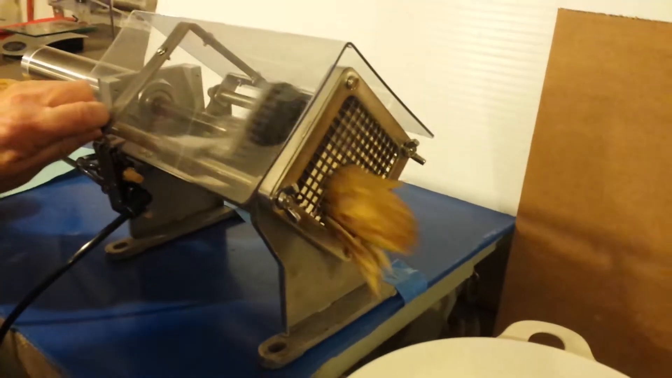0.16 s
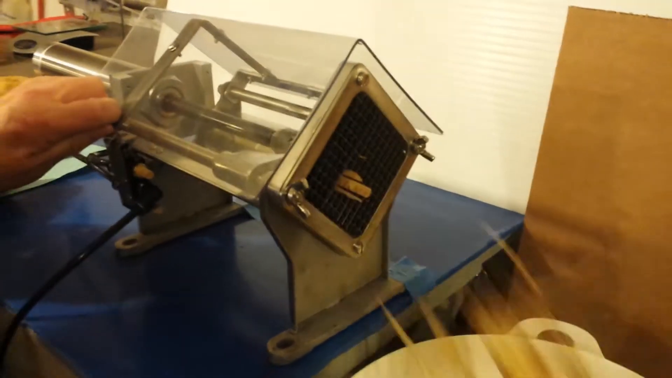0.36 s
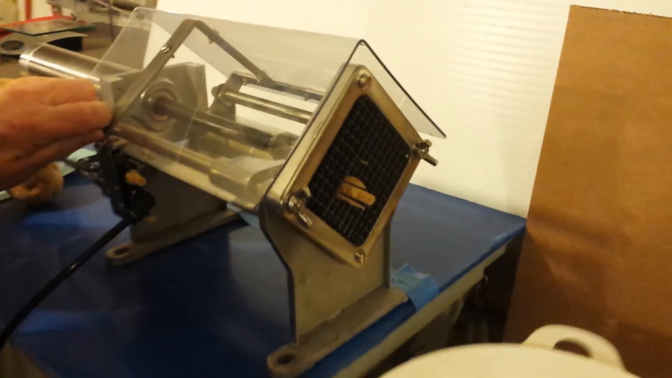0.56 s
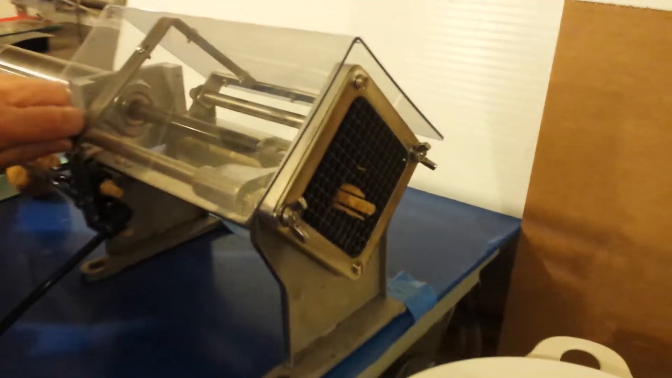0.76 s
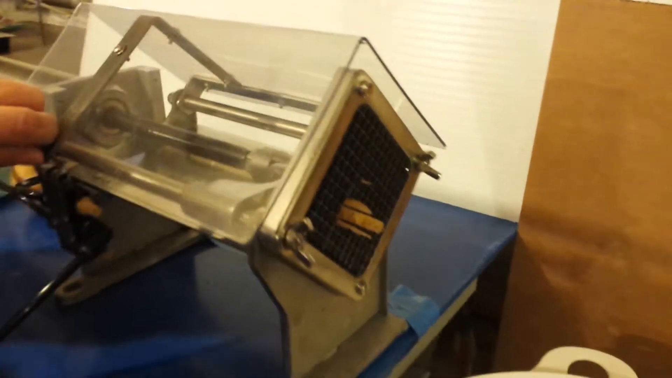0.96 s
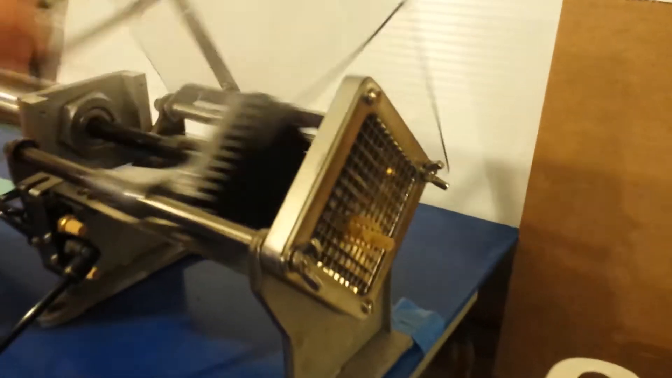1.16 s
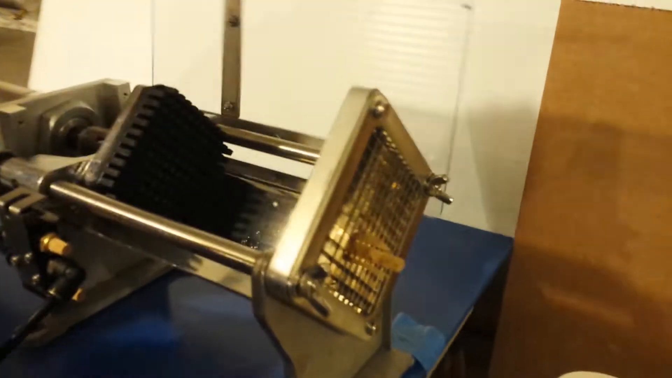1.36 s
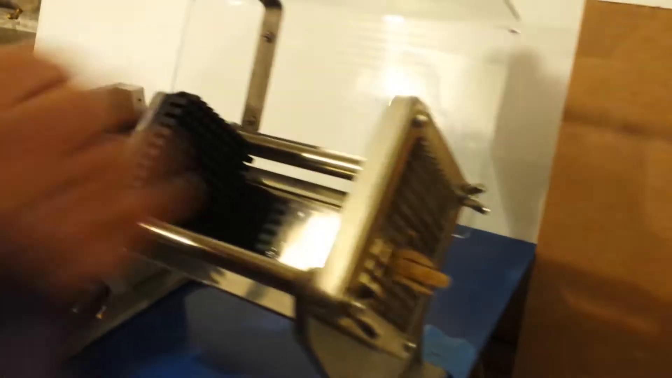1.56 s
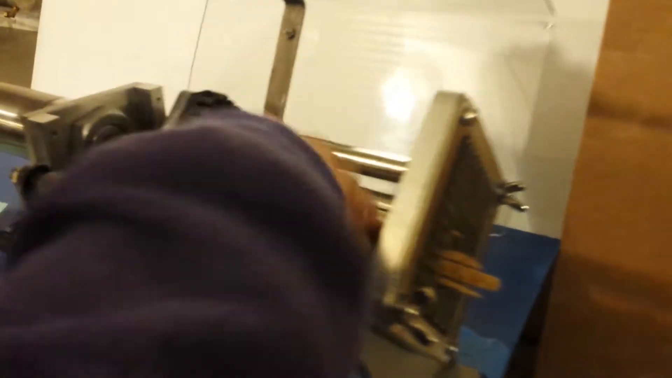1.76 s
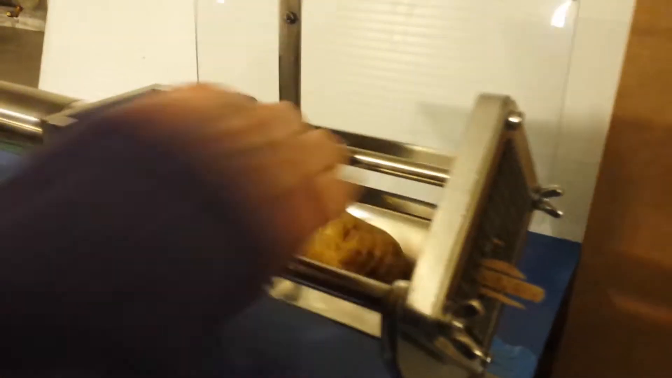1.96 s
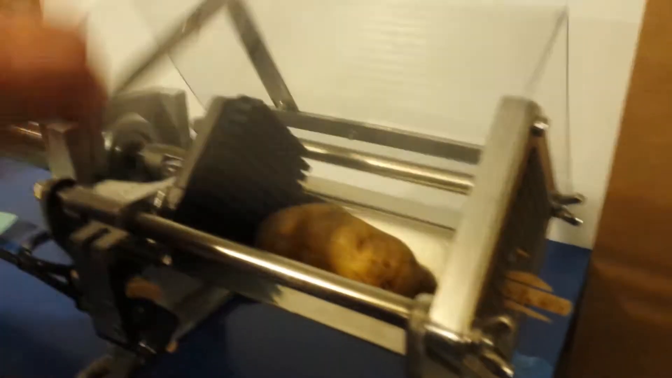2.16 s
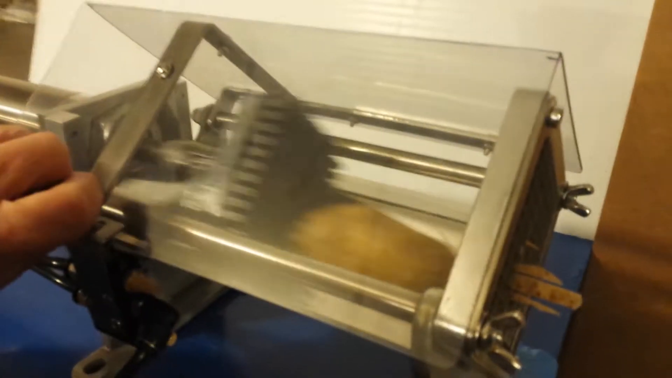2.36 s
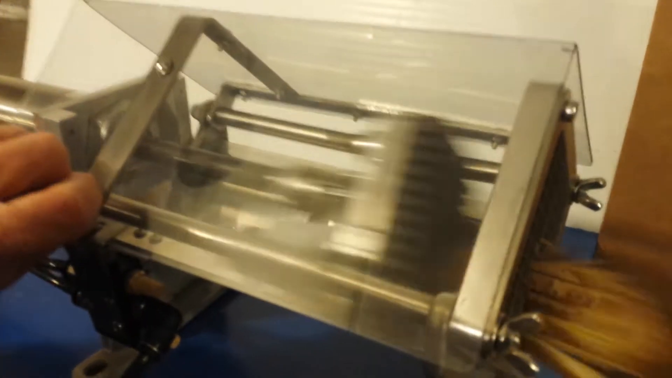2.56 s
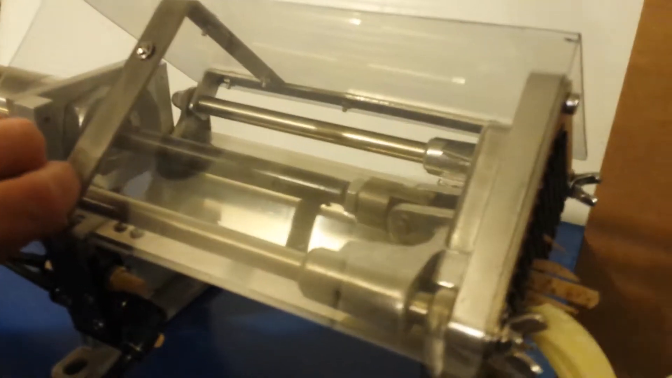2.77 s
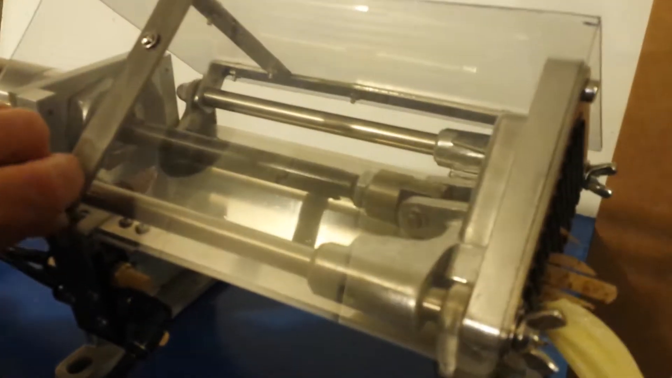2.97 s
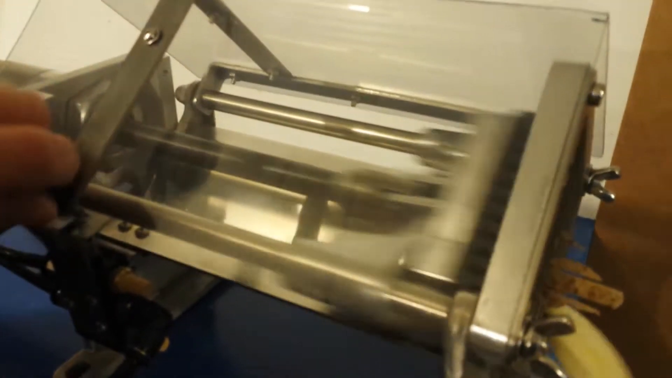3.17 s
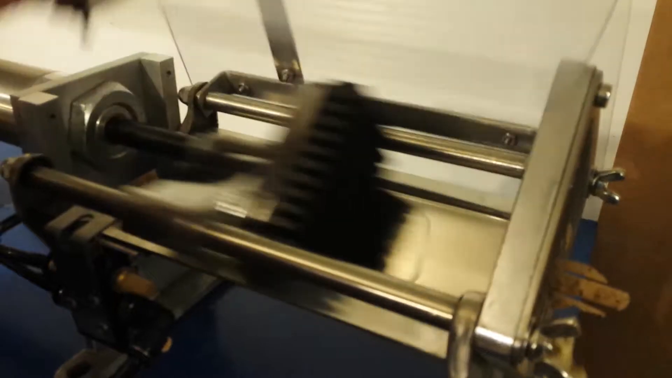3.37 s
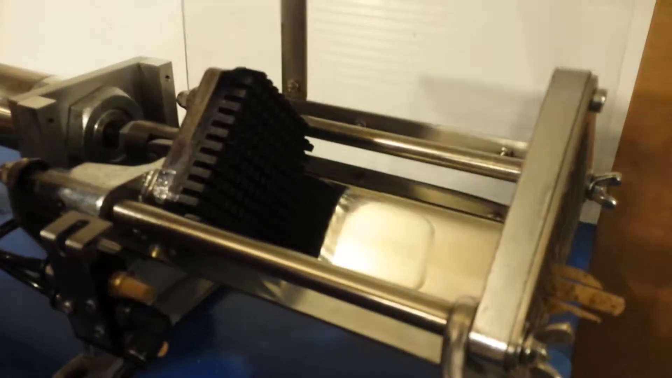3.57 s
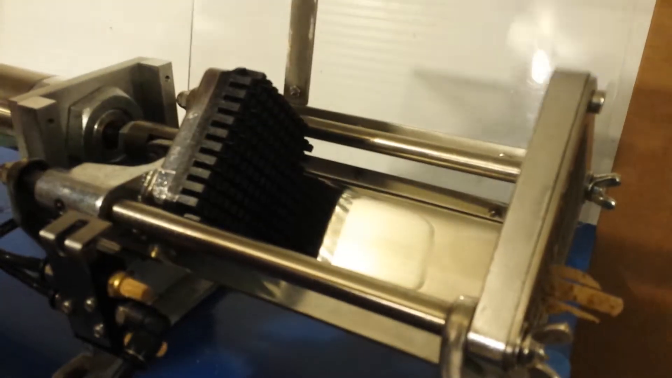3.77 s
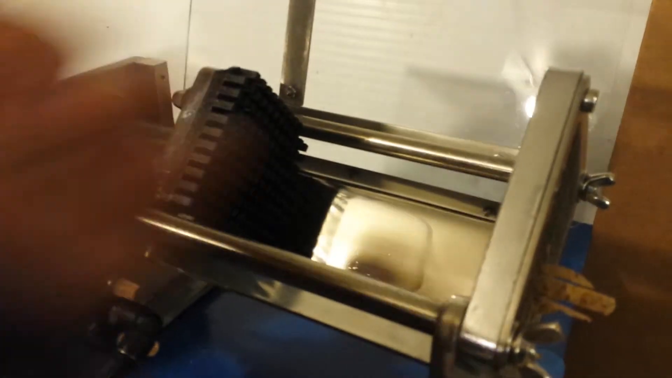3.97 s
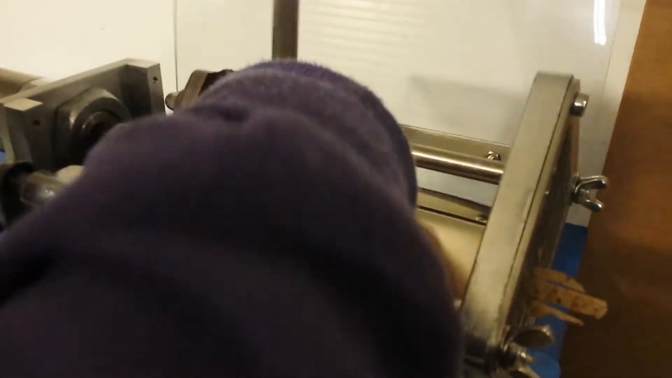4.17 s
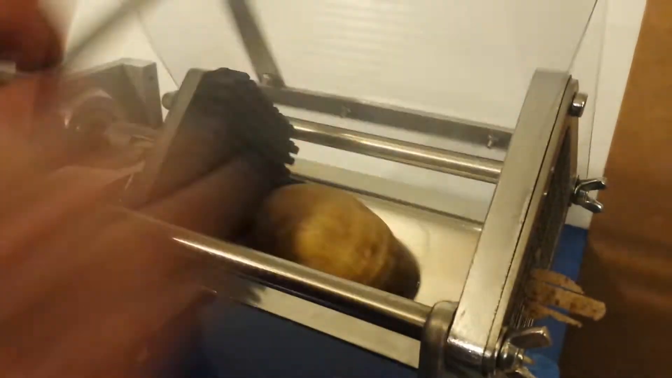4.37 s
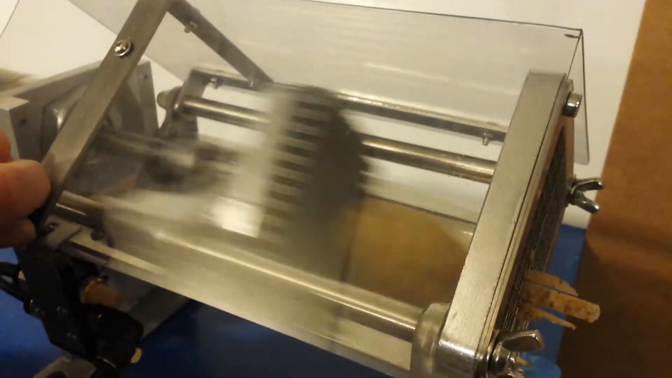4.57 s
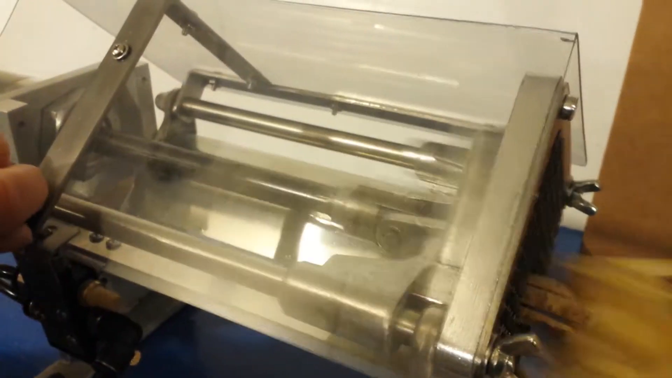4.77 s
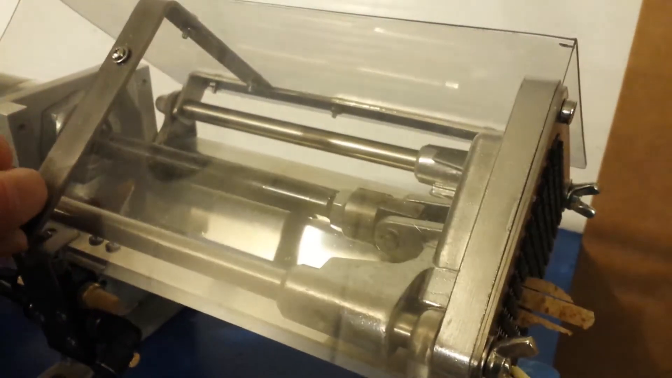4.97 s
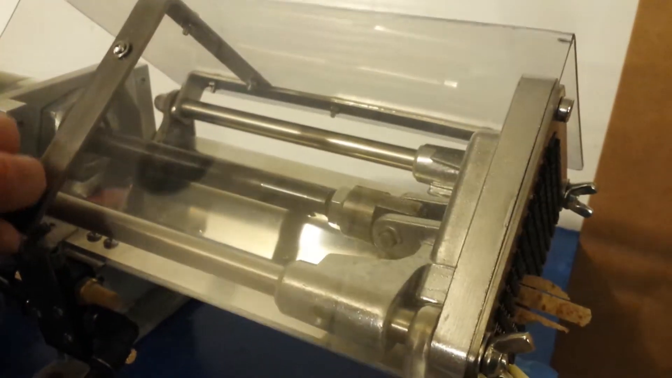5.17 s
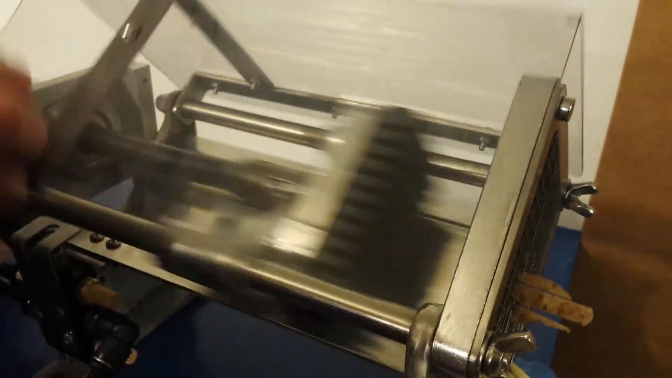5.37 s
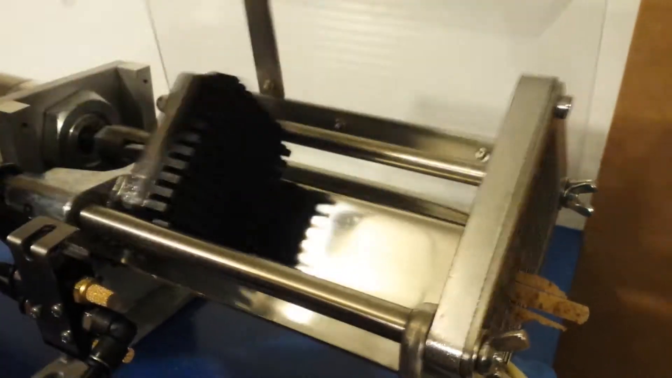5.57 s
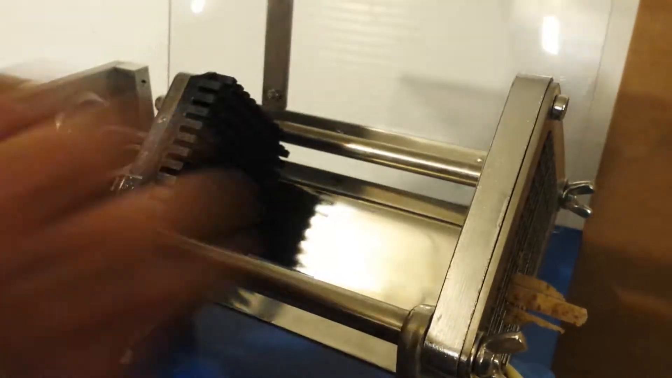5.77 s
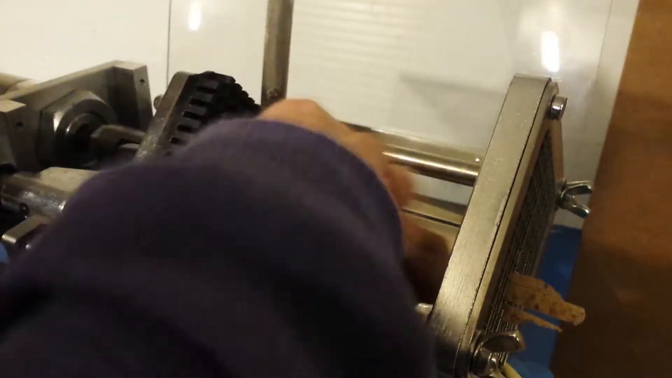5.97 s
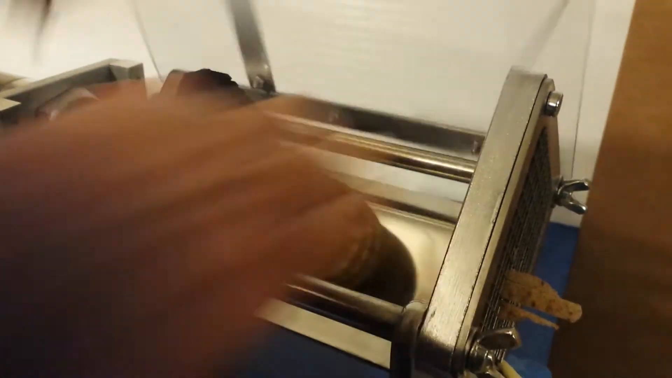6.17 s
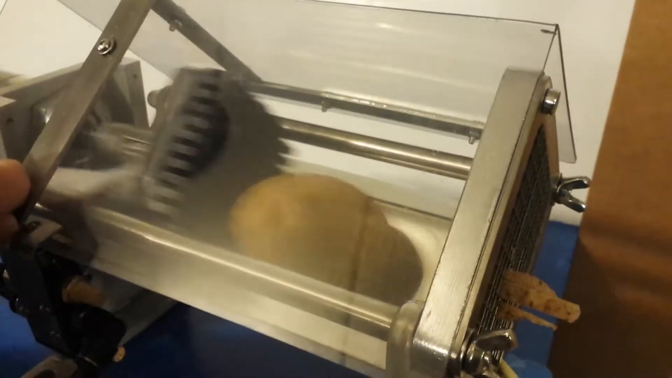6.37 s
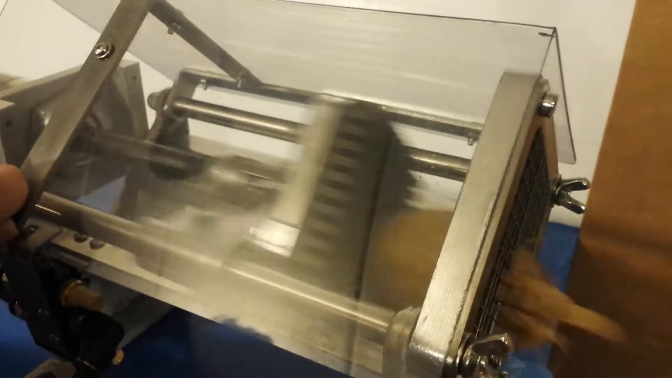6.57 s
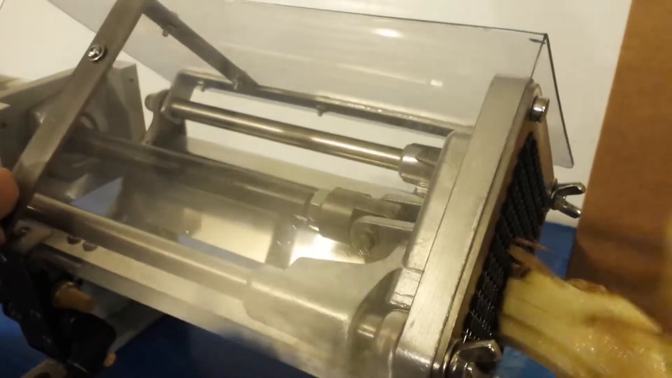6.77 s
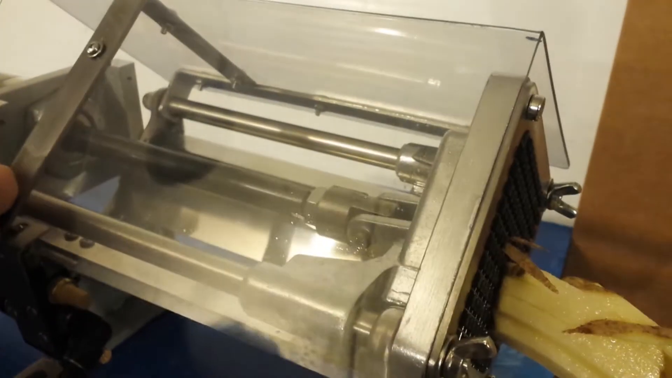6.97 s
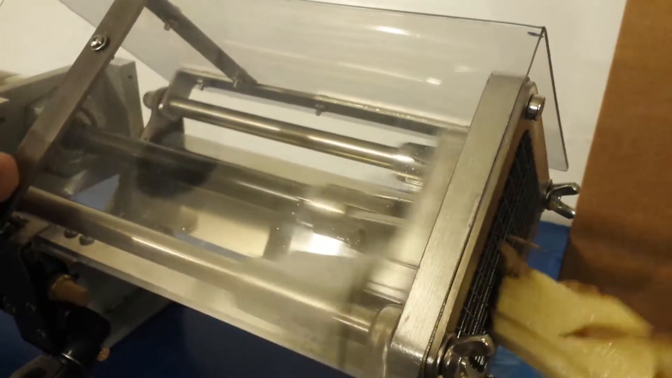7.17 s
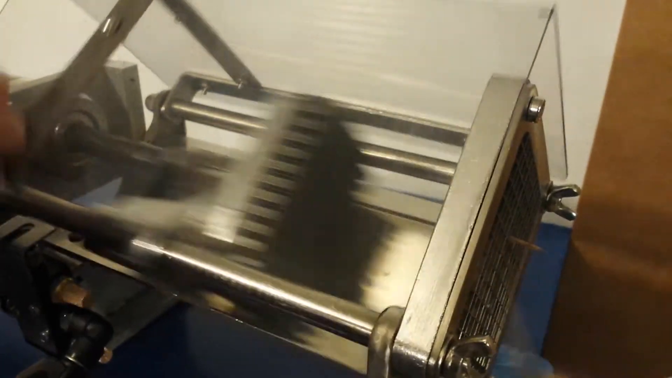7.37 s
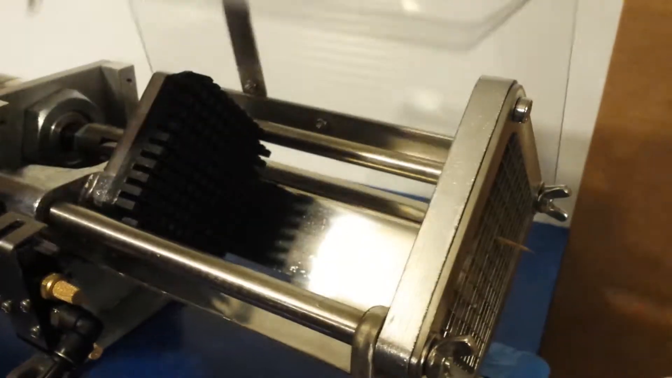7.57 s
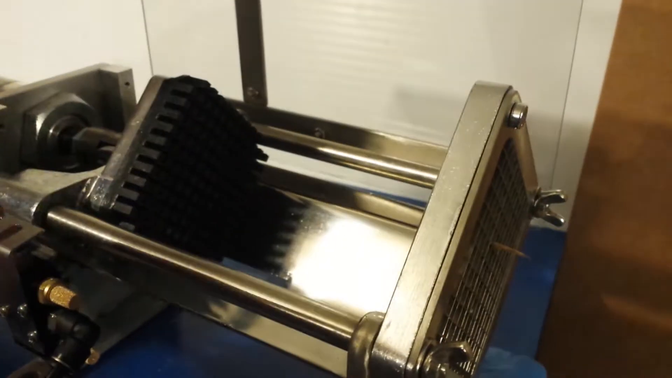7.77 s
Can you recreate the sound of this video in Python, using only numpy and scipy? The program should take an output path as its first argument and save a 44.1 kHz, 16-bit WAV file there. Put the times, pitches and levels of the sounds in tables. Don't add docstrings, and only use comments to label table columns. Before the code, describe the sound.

Sharp pneumatic hisses in alternating cut and return strokes, each ending in a metallic slam, with guard knocks and potato strips tapping a plastic tub.

```python
import sys
import numpy as np
from scipy import signal
from scipy.fft import rfft, irfft, next_fast_len
from scipy.io import wavfile
from scipy.ndimage import uniform_filter1d

SR = 44100
rng = np.random.default_rng(int(sys.argv[2]) if len(sys.argv) > 2 else 0)


def volts_from_db(level):
    exponent = np.asarray(level, float) / 20
    return 10 ** exponent


def wav_out(sig):
    wavfile.write(sys.argv[1], SR, np.round(np.clip(np.atleast_2d(sig).T, -1, 1) * 32767).astype(np.int16))


N = 345303
TIME = np.arange(N) / SR


def colour(x, points):
    hz, db = np.transpose(points)
    size = next_fast_len(len(x))
    bins_hz = np.arange(size // 2 + 1) * SR / size
    gain_db = np.interp(np.log(bins_hz + 1), np.log(hz), db)
    y = irfft(rfft(x, size) * volts_from_db(gain_db), size)[:len(x)]
    return y / y.std()


def colour_ports(noises, spectra):
    return np.array([colour(noise, points) for noise, points in zip(noises, spectra)])


def pair(count, likeness, lag_s=0.):
    shared, left, right = rng.standard_normal((3, count))
    likeness = np.clip(likeness, 0, 1)
    common = np.array([shared, np.roll(shared, int(lag_s * SR))])
    return np.sqrt(likeness) * common + np.sqrt(1 - likeness) * np.array([left, right])


def walk(count, rate):
    k = int(SR / rate)
    w = uniform_filter1d(np.repeat(rng.standard_normal(count // k + 2), k), k)[:count]
    return w / w.std()


def fade(t, t60):
    return np.exp(-np.log(1000) * np.maximum(t, 0) / max(t60, .003))


def echoes(lag_s, echo_db, t60):
    t = TIME[:4096]
    paths = volts_from_db(echo_db) * rng.standard_normal((2, len(t))) * fade(t, t60)
    paths[0, 40] += 1
    paths[1, 40 + int(lag_s * SR)] += 1
    response = rfft(paths)
    return irfft(response / np.sqrt(uniform_filter1d(abs(response) ** 2, size=45)))


def travel(air, ram, lag_s, stages):
    out = 0
    for k in range(stages):
        share = np.cos(np.pi / 2 * np.clip(ram * (stages - 1) - k, -1, 1))
        out = out + share * signal.fftconvolve(air, echoes(lag_s, -8.5, 0.029), axes=1)[:, :len(ram)]
    return out


# frequency in Hz, level in dB per Hz.
JET_FAR = [
    [(340, -42), (2070, -18), (5510, -8), (6200, 1), (10160, -13), (11890, -9.5), (12580, -37),
     (13610, -23.5), (14470, -35), (15160, -14.5)],
    [(340, -27.5), (3270, -17.5), (3620, -12), (7410, -0.5), (8100, -4.5), (9820, 2), (11540, -9.5),
     (12750, -4.5), (14470, -16.5), (15160, -8)],
]
JET_CUT = [
    [(340, -32.5), (2070, -23.5), (3620, -8), (4100, -13), (4480, -10.5), (5170, -8.5), (6370, 4.5),
     (7750, -12), (8440, -9), (10510, -13.5), (11370, -23.5), (12060, -13), (14300, -15), (14990, -38.5),
     (15160, -20)],
    [(340, -19.5), (1380, -24), (2240, -10.5), (2760, -15), (3700, -9.5), (4100, -17), (4820, 3),
     (5680, -5.5), (7240, -3), (8440, -1), (8960, 3), (10160, -7), (11370, -2), (12750, -9), (15160, -8.5)],
]
JET_BACK = [
    [(340, -35.5), (1030, -34.5), (1720, -30.5), (2240, -28.5), (3050, -18.5), (3200, -31), (3370, -32),
     (3500, -9), (4200, -4.5), (5170, -9.5), (6200, 5), (8100, -19), (9300, -7), (12230, -21),
     (13780, -16.5), (14990, -24.5), (15160, -13.5)],
    [(340, -26.5), (1210, -29), (2070, -21.5), (3050, -18.5), (3200, -31.5), (3370, -32), (3500, -8),
     (5000, -0.5), (5860, -7), (7240, 2.5), (8960, 0.5), (9300, -3.5), (10340, -5), (11890, -3),
     (13950, -8.5), (15160, -11.5)],
]
# valve opens in seconds, shuts in seconds, air level in dB,
# swell over the stroke in dB, left minus right in dB.
STROKES = [
    (-.05, 0.356, -19.5, 0.5, -3),
    (0.9955, 1.404, -18.5, -0.5, -1.2),
    (2.3616, 2.726, -17.5, -2, -0.5),
    (3.147, 3.551, -16.5, -1, 1),
    (4.492, 4.851, -16.5, -0.5, -1.5),
    (5.2403, 5.642, -17, -1, 0.2),
    (6.403, 6.78, -16.5, -1.5, -0.4),
    (7.183, 7.591, -17, -1.5, 0.2),
]


def jet():
    far = JET_FAR, (.006, .002, -24, .1), (0, -1, -1, 5.5), -.0002
    cut = JET_CUT, (.0035, .002, -24, .085), (0.28, 0.062, -0.36, 0.14), -.0006
    back = JET_BACK, (.0125, .022, -27, .08), (6.44, 0.82, .1, 1.5), -.0002
    leak_db, leak_rise_s, bleed_t60_s = -30, .02, .42
    high_pass = signal.butter(2, 350, "high", fs=SR, output="sos")
    roar_pass = signal.butter(3, 2800, fs=SR, output="sos")
    body_pass = signal.butter(3, 8300, fs=SR, output="sos")
    out = np.zeros((2, N + SR))
    for (opens, shuts, jet_db, swell_db, pan_db), kind in zip(STROKES, [far, back] + [cut, back] * 3):
        spectra, (rise, leak, bleed_db, t60), (roar_db, top_db, tilt_db, drift_db), lag_s = kind
        start = max(int((opens - .05) * SR), 0)
        t = start / SR + TIME[:32768]
        ram = np.clip((t - opens) / (shuts - opens), 0, 1)
        gate = np.clip((t - opens) / rise, 0, 1)
        seep = volts_from_db(leak_db) * np.clip((t - opens + leak) / leak_rise_s, 0, 1) * (1 - gate)

        air = colour_ports(travel(pair(len(t), 0.85), ram, lag_s, stages=3), spectra)
        air = signal.sosfilt(high_pass, air)
        roar = signal.sosfiltfilt(roar_pass, air)
        body = signal.sosfiltfilt(body_pass, air)
        middle, top = body - roar, air - body
        air = volts_from_db(roar_db + tilt_db * (ram + 0.5)) * roar
        air = air + middle * volts_from_db(0.6 * walk(len(t), 45))
        air = air + top * volts_from_db(top_db + 1.0 * walk(len(t), 37))

        after = t - shuts
        bleed = volts_from_db(bleed_db) * fade(after, bleed_t60_s) * body
        air = body * fade(after, t60) + (air - body) * fade(after, .7 * t60) + bleed
        side_db = pan_db + drift_db * (ram - .5)
        level_db = jet_db + swell_db * (ram - .5) + 4 + np.array([side_db, -side_db]) / 2
        out[:, start:start + len(t)] += (air * gate + middle * seep) * volts_from_db(level_db)
    return out[:, :N]


# opens in seconds, shuts in seconds, air level in dB.
SPUTTER = [(2.318, 2.32, -37), (4.489, 4.488, -27), (6.3415, 6.345, -22.5), (6.3455, 6.347, -18.5),
           (6.349, 6.356, -30), (6.357, 6.363, -19.5), (6.3635, 6.377, -22.5)]


def sputter():
    out, t = np.zeros((2, N + SR)), TIME[:4096]
    for opens, shuts, db in SPUTTER:
        air = colour_ports(pair(len(t), .6, -0.00048), JET_CUT)
        envelope = np.clip(t / .0008, 0, 1) * fade(t - (shuts - opens), 0.012)
        out[:, int(opens * SR):][:, :4096] += volts_from_db(db + 3) * air * envelope
    return out[:, :N]


def ring(strikes, modes, shorten, spread=0.99):
    t = TIME[:SR // 3]
    body = 0
    for hz, db, t60 in modes:
        for off in (-.012, 0, .017):
            cycles = hz * (1 + spread * off) * t + 0.5 * rng.random((2, 1))
            body = body + volts_from_db(db - 2) * np.sin(2 * np.pi * cycles) * fade(t, t60 * shorten)
    return signal.oaconvolve(strikes, body, axes=1)[:, :N]


# frequency in Hz, level in dB per Hz.
THUD = [(60, -25.5), (150, 0.5), (250, 1), (400, -0.5), (700, 2.5), (1000, -8), (2000, -42.5)]


def blows(events, rise, clack, crack, thud=THUD, snap=0.59, alike_low=0.44, clack_off_db=0, body=1.):
    out = np.zeros((2, N + SR))
    for s, clack_db, thud_db, crack_db, t60, pan_db in events:
        t = TIME[:4096 if t60 < .07 else 12288]
        shape = np.clip(t / rise, 0, 1) * volts_from_db(1.5 * walk(len(t), 300))
        parts = ((thud_db, thud, alike_low, 1.4 * body),
                 (clack_db + clack_off_db, clack, .35, 1.01 * body),
                 (crack_db, crack, .4, .9))
        sound = 0
        for db, points, likeness, slow in parts:
            decay = fade(t, t60 * slow) + snap * fade(t, 0.12 * t60 * slow)
            part = colour_ports(pair(len(t), likeness), [points, points]) * shape * decay
            early = part[:, :int(t60 * SR / 8) + 40]
            sound = sound + volts_from_db(db - 2.5) * part / np.sqrt(np.mean(early ** 2))
        start = int((s - min(rise, .002) / 2) * SR)
        out[:, start:start + len(t)] += sound * volts_from_db(np.array([[pan_db], [-pan_db]]) / 2)
    return out[:, :N]


def forced(events, clack_db, thud_db, crack_db, t60, pan_db):
    return [(s, db + clack_db, db + thud_db, db + crack_db, t60, pan_db) for s, db in events]


def alike(events, *shared):
    return [(*row, *shared) for row in events]


# start in seconds, force in dB.
CUT_STOP = [(.3345, -17.5), (2.7141, -18.5), (4.8393, -18.5), (6.7688, -20.5)]
# frequency in Hz, level in dB per Hz.
CLACK = [(500, -23), (1000, -1), (1500, -1.5), (2200, 0.5), (3000, 1), (5000, -54)]
CRACK = [(2000, -26.5), (3200, -4.5), (4500, 2.5), (6500, 4), (9000, -5), (12000, -23), (16000, -20.5)]
# frequency in Hz, level in dB, t60 in seconds.
GRID = [(242, -8, .3), (635, -2, .4), (721, -3, .35), (1200, -6, .15), (1683, -6, .15), (1812, -1, .18),
        (2169, -5, .4), (2654, -5, .16), (2934, -3, .2), (3456, -6, .2), (3790, -6, .2)]


def cutting_stop():
    events = forced(CUT_STOP, clack_db=0.4, thud_db=-10.5, crack_db=4.5, t60=0.2641, pan_db=2)
    cut = blows(events, .0015, CLACK, CRACK, snap=.6, clack_off_db=-1.5, body=0.62)
    return cut + volts_from_db(-50.5) * ring(cut, GRID, 0.49, spread=0.59)


# start in seconds, force in dB.
BACK_STOP = [(1.3868, -17.5), (3.5375, -16.5), (5.6284, -15.5), (7.5743, -16.5)]
# frequency in Hz, level in dB per Hz.
CLANG = [(2000, -21.5), (3200, -9), (4300, 1), (5200, -4), (6500, -8), (9000, -12.5), (12000, -21),
         (16000, -28)]
# frequency in Hz, level in dB, t60 in seconds.
FRAME = [(678, -10, .4), (2153, -1, .33), (3036, -7, .22), (4070, -3, .2), (4240, -2, .2), (4463, 0, .19),
         (4689, -5, .22), (4823, -5, .22), (5308, -8, .25), (5755, -8, .2)]


def return_stop():
    events = forced(BACK_STOP, clack_db=-2, thud_db=-11.5, crack_db=8, t60=0.0812, pan_db=1.9)
    back = blows(events, 0.0029, CLACK, CLANG, snap=0.9, alike_low=0.29, clack_off_db=0.1, body=0.93)
    return back, volts_from_db(-46.5) * ring(back, FRAME, .36, spread=.35)


# start in seconds, clack peak in dB, thud in dB, crack in dB, t60 in seconds.
GUARD = [(.6622, -27, -37.5, -27.5, 0.038), (.6774, -41, -35, -55, 0.038), (2.2974, -25.5, -26, -25, 0.13),
         (2.3184, -31.5, -34, -31, 0.064), (4.2573, -44.5, -44, -44, 0.086),
         (4.4887, -29, -31.5, -26, 0.061), (4.4946, -23.5, -24.5, -19.5, 0.1),
         (6.3345, -23.5, -30, -21.5, 0.065), (6.3455, -30, -29, -28, 0.056),
         (6.3573, -38.5, -34.5, -31, 0.088)]
# frequency in Hz, level in dB per Hz.
TICK = [(2000, -29.5), (3500, -4.5), (5000, -4), (6500, -4), (8500, -12.5), (11000, -24), (16000, -29)]


def guard():
    return blows(alike(GUARD, -0.5), 0.001, CLACK, TICK)


# start in seconds, force in dB.
SPOOL = [(1.003, -43.5), (2.367, -31.5), (3.157, -34.5), (5.25, -38.5), (6.408, -33.5), (7.19, -37.5)]
# frequency in Hz, level in dB per Hz.
KNOCK = [(200, -20), (500, -9.5), (680, -3.5), (850, -12.5), (1500, -30.5)]


def spool():
    events = forced(SPOOL, clack_db=-11, thud_db=0.2, crack_db=-13.5, t60=0.19, pan_db=0.9)
    return blows(events, 0.0071, CLACK, TICK, KNOCK)


# start in seconds, peak in dB, pitch in Hz, left minus right in dB,
# radians by which left leads.
BENCH = [(0.333, -34, 90, -0.5, 1.5), (1.386, -37.5, 203.2, -4, -0.5), (2.716, -43, 131.3, -0.5, -.2),
         (3.54, -24.5, 200, -6, 1), (4.498, -25.5, 148.7, 0, -4.5), (4.844, -41, 149.5, 5.5, 0),
         (5.630, -35, 150, -5, 0.5), (6.404, -37, 70, 1.5, .1), (6.77, -15.5, 135, 12.5, 1.5),
         (7.577, -28, 100.4, -9.5, 0.9)]


def bench():
    out, t = np.zeros((2, N + SR)), TIME[:SR // 4]
    side = np.array([[.5], [-.5]])
    for s, db, hz, pan_db, lead in BENCH:
        swing = np.sin(2 * np.pi * hz * t * (1 - 0.69 * t) + lead * side)
        swing = swing * np.clip(t / 0.0017, 0, 1) * fade(t, 0.05)
        out[:, int(s * SR):][:, :len(t)] += volts_from_db(db + pan_db * side) * swing
    return out[:, :N]


# start in seconds, clack peak in dB, thud in dB, crack in dB.
TRAY = [(1.7520, -63, -62, -49.5), (1.7579, -46.5, -55, -54.5), (1.8440, -59.5, -58, -54),
        (1.8530, -49, -54.5, -52), (1.8620, -50.5, -46.5, -51), (3.932, -58, -55.5, -73),
        (4.13, -61, -59.5, -78.5), (4.2282, -47.5, -44, -65), (6.0227, -47.5, -47.5, -49.5),
        (6.0437, -55, -65, -52.5), (6.095, -40.5, -44.5, -35)]
# frequency in Hz, level in dB per Hz.
PLOP = [(600, -35), (1100, -7.5), (1500, -4), (1900, -4.5), (2800, -16), (5000, -45.5)]
GRIT = [(2000, -23), (3500, -10), (5000, -9.5), (6500, -6.5), (8500, -13.5), (11000, -22.5), (14000, -28),
        (16000, -43.5)]
# frequency in Hz, level in dB, t60 in seconds.
PAN = [(515, -4, .15), (685, 0, .3), (830, -6, .12), (1380, -5, .14), (1720, -1, .16), (1810, -4, .14),
       (2900, -9, .14), (5850, -9, .2)]


def tray():
    bumps = blows(alike(TRAY, .075, 0.5), 0.0013, PLOP, GRIT)
    return bumps + volts_from_db(-46) * ring(bumps, PAN, .6, spread=0.57)


# start in seconds, clack peak in dB, thud in dB, crack in dB.
STRIPS = [(.3610, -30, -36.5, -21.5), (.5074, -36, -38.5, -31.5), (.5352, -23.5, -42.5, -31.5),
          (.5454, -28.5, -45.5, -36.5), (.7203, -44.5, -47, -55.5), (.7392, -47.5, -40.5, -57.5),
          (2.8844, -49.5, -44, -47), (2.8993, -47, -49.5, -47), (2.9238, -47.5, -51.5, -45),
          (2.9444, -52, -48.5, -51.5), (2.9741, -40, -39, -45.5), (2.9804, -38.5, -52.5, -49.5),
          (5.0245, -34, -60.5, -55.5), (5.0404, -55, -48.5, -43.5), (5.0484, -48, -60.5, -39),
          (5.0744, -51, -53.5, -42.5), (5.0893, -37.5, -56.5, -55.5), (5.1781, -66.5, -52, -58.5),
          (6.7002, -21.5, -29, -20.5), (6.990, -26.5, -48, -50), (6.997, -50, -53, -56),
          (7.005, -38, -50, -51), (7.0249, -39, -41, -47), (7.0434, -47, -44, -48),
          (7.1496, -57.5, -51, -46)]


def strips():
    return blows(alike(STRIPS, .048, 2.5), 0.001, PLOP, GRIT, clack_off_db=-8.5)


# start in seconds, peak in dB, pitch in Hz, t60 in seconds.
TAPS = [(.5068, -28.5, 6400, 0.013), (0.521, -27, 1670, 0.036), (.5236, -30.5, 1480, .04),
        (0.528, -30, 1800, .03), (0.5348, -21, 1670, .03), (.5400, -27, 2000, .03),
        (0.5443, -20.5, 1620, .02), (.5530, -30.5, 1620, .03), (2.8838, -36, 6000, .006),
        (2.8993, -42, 1360, .02), (2.9240, -36, 6800, 0.013), (2.9245, -38.5, 1430, .04),
        (2.973, -35.5, 1390, .03), (2.9785, -33, 1700, 0.03), (3.932, -49, 1403, 0.045),
        (5.0247, -33.5, 1485, 0.022), (5.027, -34, 1510, 0.015), (5.0493, -33, 7700, .008),
        (5.0895, -29.5, 1500, 0.014), (5.0970, -42.5, 1490, 0.0207), (6.9893, -23.5, 1480, 0.017),
        (6.9952, -28.5, 1400, 0.019), (7.0040, -36, 1490, .06), (7.0080, -44, 1380, .05),
        (7.0247, -37, 1250, 0.036), (7.0440, -41, 6500, 0.01)]


def taps():
    lag_s = 0.00013
    out, t = np.zeros((2, N + SR)), TIME[:4096] - np.array([[lag_s], [0]])
    for s, db, hz, t60 in TAPS:
        swell = np.clip(t * hz / 0.72, 0, 1)
        tone = np.sin(2 * np.pi * hz * t) * swell * fade(t, t60)
        out[:, int(s * SR):][:, :4096] += volts_from_db(db) * tone / abs(tone).max()
    return out[:, :N] * volts_from_db(np.array([[1.5], [-1.5]]))


# start in seconds,
# clack peak in dB, thud in dB, crack in dB, t60 in seconds.
PATTER = [(.37, -39.5, -42, -28, 0.38), (.5165, -26.5, -47, -34.5, 0.1), (.53, -34.5, -52, -41.5, 0.084),
          (.542, -36, -47, -44, 0.035), (.70, -56.5, -49.5, -60, .29), (.78, -68, -53, -67.5, 0.35),
          (2.93, -54, -59, -50.5, 0.28), (4.13, -68.5, -52, -70, 0.39), (4.206, -47.5, -47.5, -50, 0.11),
          (4.396, -51.5, -48, -48.5, 0.17), (4.406, -49, -47.5, -43.5, 0.065),
          (6.715, -28.5, -35, -40.5, 0.26)]


def patter():
    return blows(alike(PATTER, 2.5), 0.013, PLOP, TICK, snap=0., clack_off_db=-1)


# start in seconds, peak in dB.
TUB_HITS = [(6.698, -36), (6.72, -26), (6.735, -28.5), (6.761, -29), (6.772, -25), (6.791, -34.5),
            (6.803, -25), (6.815, -30.5), (6.83, -33), (6.848, -32.5)]
# frequency in Hz, level in dB, t60 in seconds.
TUB = [(291, -10, .2), (549, -8, .3), (635, -1, .32), (721, -2, .28), (834, -6, .15)]


def tub():
    strikes = np.zeros((2, N))
    for s, db in TUB_HITS:
        strikes[:, int(s * SR)] = volts_from_db(db - 0.4)
    pushes = signal.fftconvolve(strikes, np.hanning(50)[None] / 25, axes=1)
    return ring(pushes, TUB, .62, spread=.5)


# frequency in Hz, t60 in seconds.
REVERB = [(150, 0.75), (500, 0.69), (1200, 0.5), (2500, 0.45), (4500, 0.33), (7000, 0.24), (10000, 0.16),
          (14000, 0.12)]


def reverb(x, wet_db):
    t, tail = TIME[:SR], 0
    for hz, t60 in REVERB:
        band = [(hz / 2.5, -20), (hz / 1.4, 0), (hz * 1.4, 0), (hz * 2.5, -20)]
        noise = colour_ports(pair(SR, 0.026), [band, band])
        tail = tail + noise * np.sqrt(hz / 4000) * fade(t, t60)
    tail = tail * np.clip((t - .004) / 0.045, 0, 1) * volts_from_db(wet_db)
    return signal.fftconvolve(x, tail, axes=1)[:, :N]


# frequency in Hz, level in dB per Hz.
ROOM_TONE = [
    [(40, -13.5), (130, -1.5), (220, -4), (300, -6), (340, -9), (520, -7.5), (650, -12.5), (1030, -18), (3140, -24.5), (5380, -23.5), (6330, -20.5), (8310, -32), (10810, -44), (15290, -48.5)],
    [(40, -15.5), (170, 1), (220, -5.5), (300, -2.5), (340, -4), (520, -8), (780, -13.5), (1940, -22), (2670, -27), (3620, -29), (4740, -23), (5600, -38), (7490, -21.5), (15290, -42.5)],
]
# frequency in Hz, level in dB.
HUM = [(86.1, -60), (177.6, -56), (226.1, -57), (376.8, -61), (457.6, -60.5), (511.4, -62.5)]


def room_tone():
    low, high = pair(N, .9, -.0002), pair(N, 0.)
    split = signal.butter(2, 800, fs=SR, output="sos")
    noise = signal.sosfiltfilt(split, low - high) * volts_from_db(0.98 * walk(N, 2.9)) + high
    tone = colour_ports(noise, ROOM_TONE) * volts_from_db([[-54], [-55]])
    hum = 0
    for hz, db in HUM:
        swell = volts_from_db(3 * walk(N, 5) - 3)
        wobble_hz = 4.5 * walk(N, 9)
        hum = hum + volts_from_db(db) * swell * np.sin(2 * np.pi * np.cumsum(hz + wobble_hz) / SR)
    return tone + hum


# frequency in Hz, level in dB per Hz.
DRAUGHT = [(25, -11), (60, -3.5), (150, 0.6), (300, -3), (600, -13.5), (1200, -41.5)]


def draught(air):
    flow = uniform_filter1d(abs(air).mean(axis=0), SR // 40)
    flow = np.clip(flow / np.median(flow[flow > flow.max() / 3]), 0, 1)
    rumble = colour_ports(pair(N, 0.2), [DRAUGHT, DRAUGHT])
    duck_db = -4.5
    return volts_from_db(duck_db * flow) * room_tone() + volts_from_db(-51.5) * flow * rumble


def scene():
    air = jet() + sputter()
    back, clang = return_stop()
    knocks = cutting_stop() + clang + guard() + spool() + bench() + tray()
    food = strips() + taps() + patter() + tub()
    to_walls = knocks + volts_from_db(2) * back + volts_from_db(-6.5) * air + volts_from_db(-2.5) * food
    return air + back + knocks + food + reverb(to_walls, -51.5) + draught(air)


def band_limit(x):
    return signal.sosfilt(signal.butter(12, 15910, fs=SR, output="sos"), x)


def record(dry):
    dry = signal.sosfilt(signal.ellip(10, .5, 70, 15520, fs=SR, output="sos"), dry)
    return band_limit(np.clip(dry, -1, 1))


dry = scene()
out = record(dry)
wav_out(out)
```